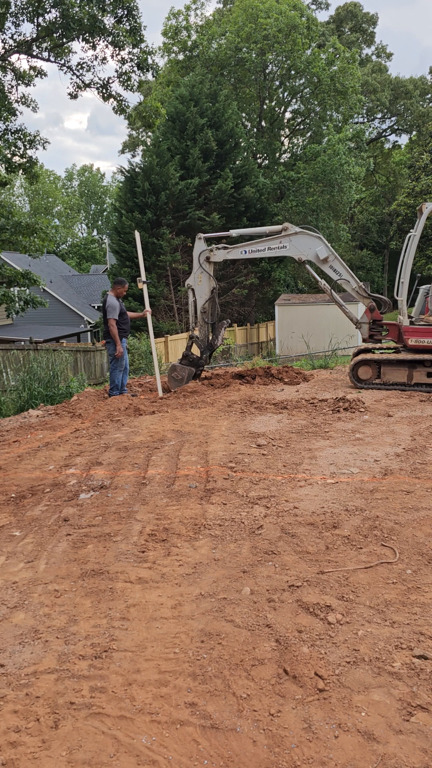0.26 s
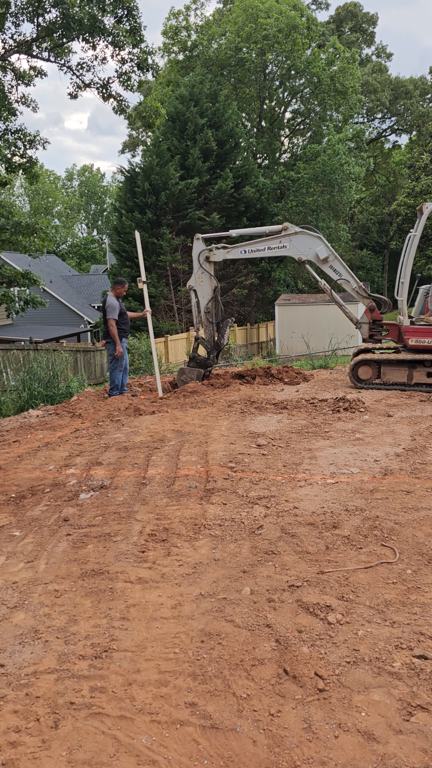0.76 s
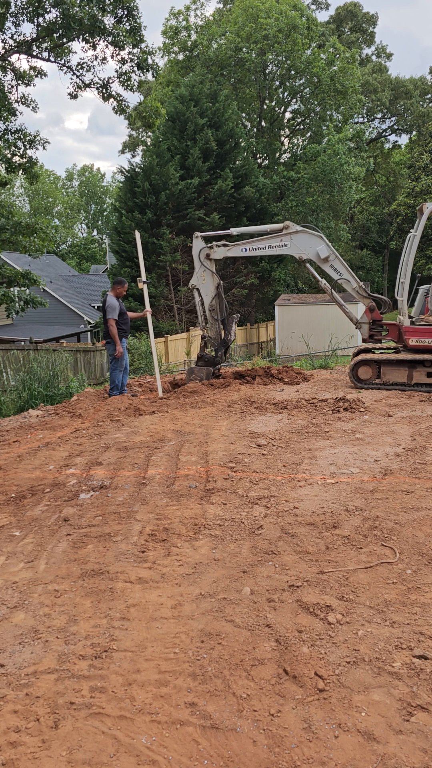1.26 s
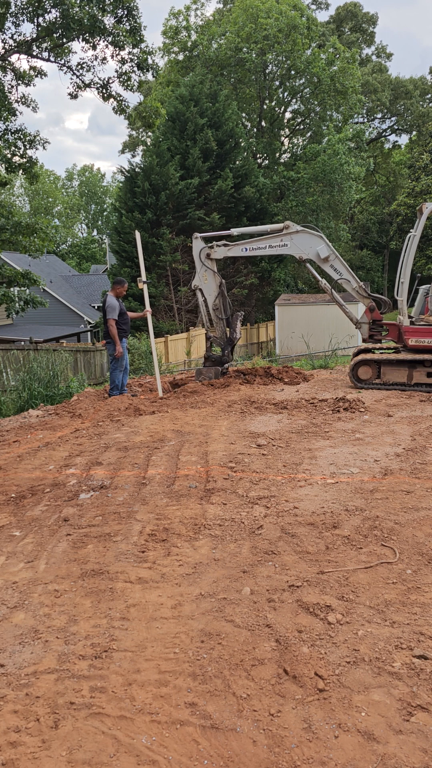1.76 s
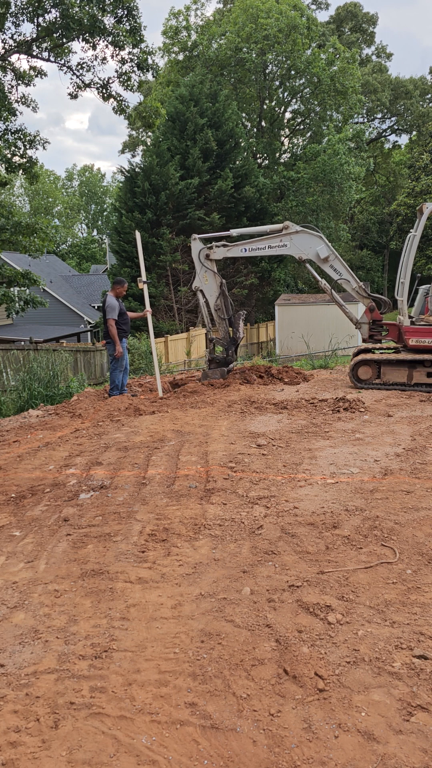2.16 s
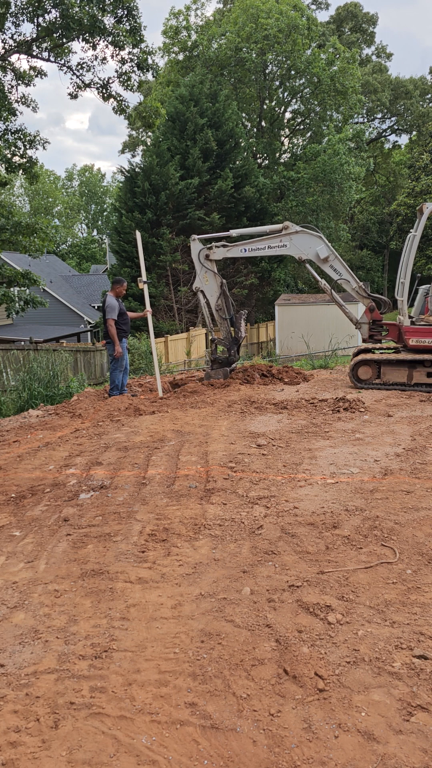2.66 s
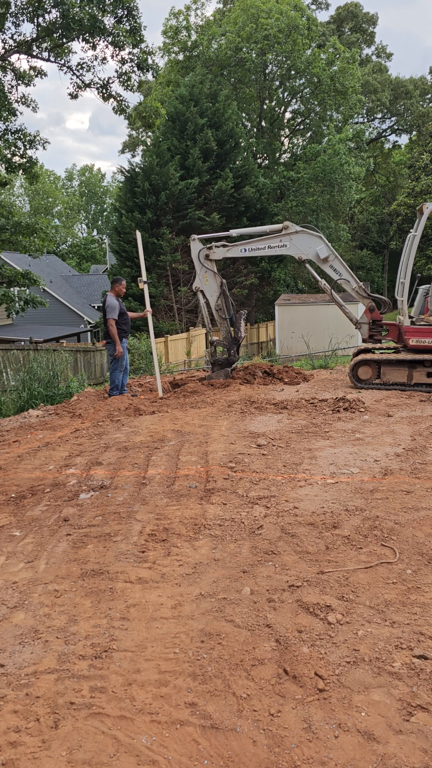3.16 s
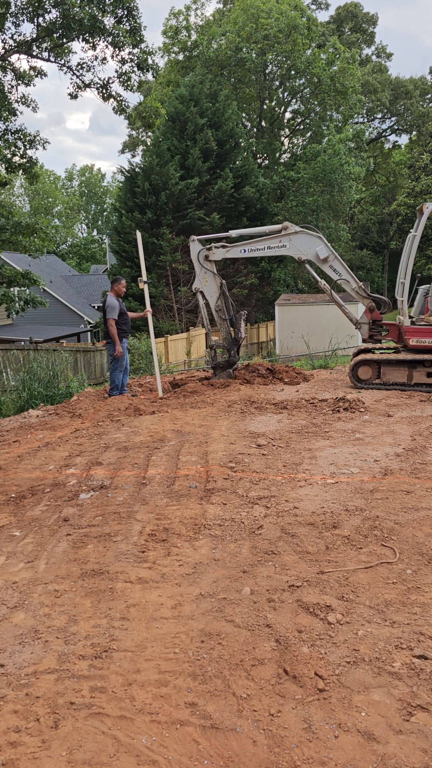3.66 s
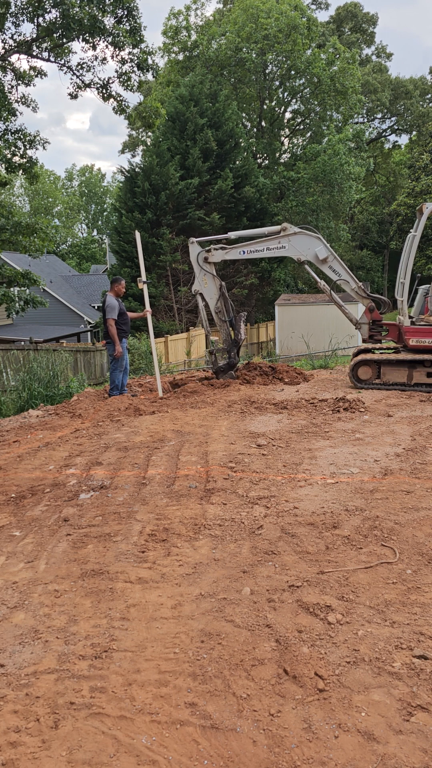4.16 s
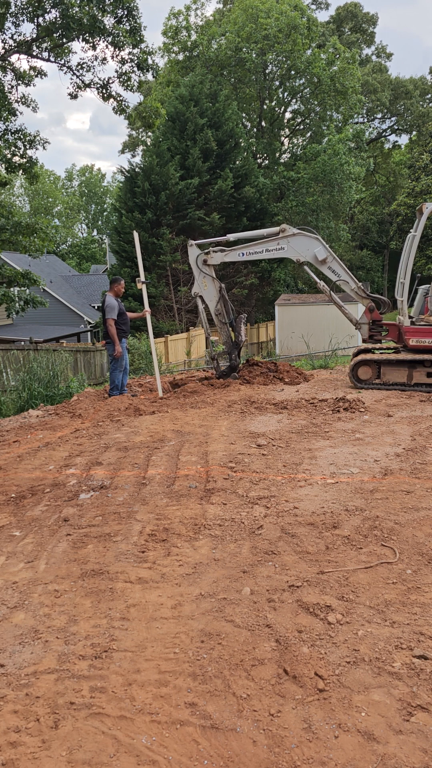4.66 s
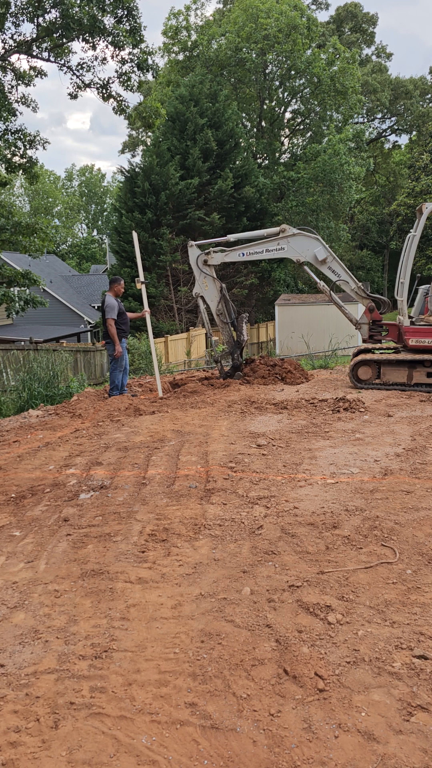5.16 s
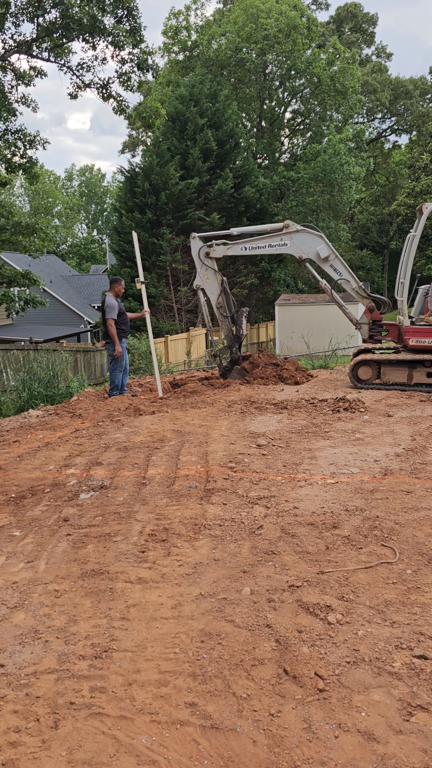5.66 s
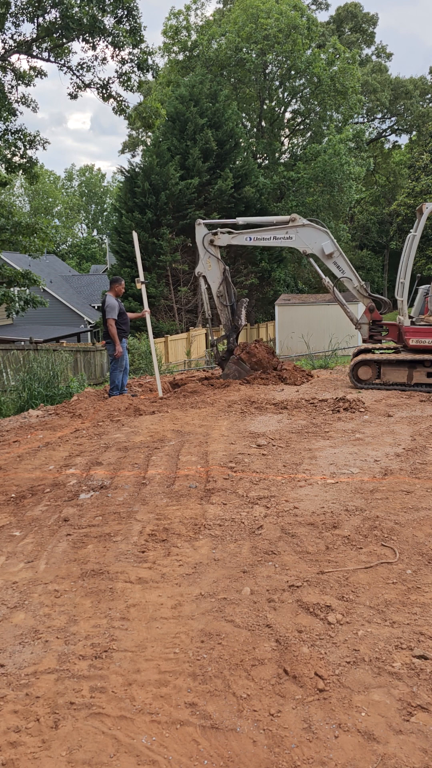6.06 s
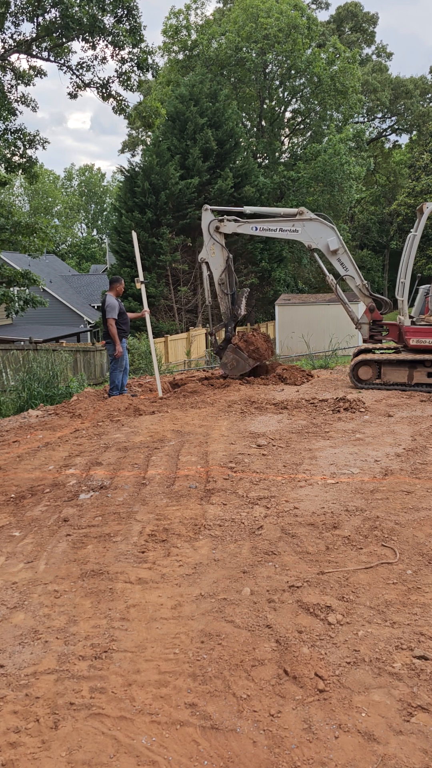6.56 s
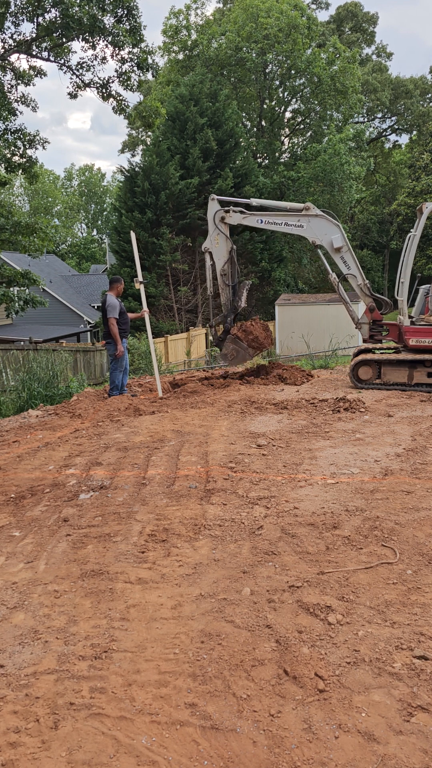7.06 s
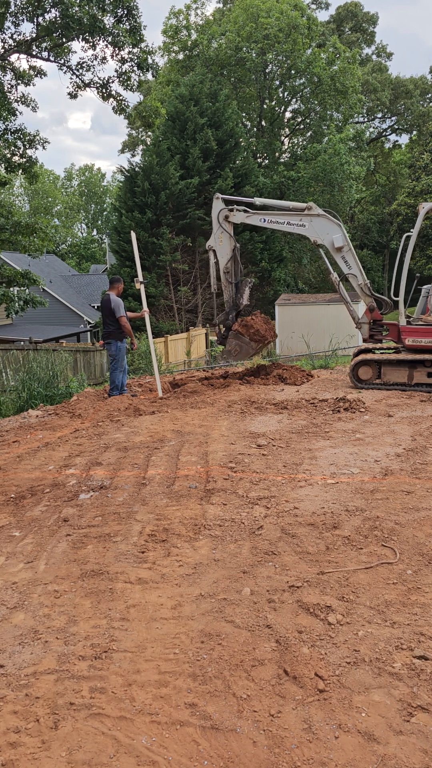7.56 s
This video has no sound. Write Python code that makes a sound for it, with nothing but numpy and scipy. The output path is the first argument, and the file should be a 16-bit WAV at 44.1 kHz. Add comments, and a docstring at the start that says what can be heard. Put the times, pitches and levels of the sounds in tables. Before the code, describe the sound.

Loud, hoarse single barks from a big dog near the stereo microphone come roughly every second, after one faint whine, with short reflections from fence and trees. Behind them, across an open building site, a small digger's diesel drones and clatters while its pump hums and oil hisses. The engine later runs lighter and a little faster, a valve gives a brief high whistle, and the arm lifts before the final bark.

```python
"""A building site on a stereo microphone: a mini excavator some way off, a big dog close by.
The bucket drags through clay; the three-cylinder diesel throbs and clatters, the pump hums, oil hisses
in the valves. The dog gives a faint whine, then barks eight times, about once a second; fence and trees
answer briefly. Near 5 s the bucket comes free, the engine picks up speed and the throb eases.
The boom valve opens with a thin whistle, and a short, light hoist follows before the last bark."""
import sys
import numpy as np
from scipy import signal
from scipy.fft import rfft, irfft, next_fast_len
from scipy.io import wavfile
from scipy.ndimage import uniform_filter1d, minimum_filter1d, map_coordinates

SR = 44100
rng = np.random.default_rng(int(sys.argv[2]) if len(sys.argv) > 2 else 0)


def store_wav(level_fs):
    """Save 16-bit WAV to argv[1]."""
    pcm = np.round(np.clip(np.atleast_2d(level_fs), -1, 1) * 32767)
    wavfile.write(sys.argv[1], SR, pcm.T.astype(np.int16))


N = 344862
T = np.arange(N) / SR


def amp(db):
    """Decibels to gain."""
    return 10 ** (np.asarray(db) / 20)


def unit(x):
    """x at rms 1."""
    return x / np.sqrt(np.mean(x ** 2) + 1e-20)


def along(points, hz):
    """Read (f/Hz, value) points on a log frequency axis."""
    f, v = np.transpose(points)
    return np.interp(np.log(hz + 1), np.log(f + 1), v)


def ramp(t, middle, ramp_s):
    """A straight rise from 0 to 1 that takes ramp_s."""
    return np.clip(.5 + (t - middle) / ramp_s, 0, 1)


def held(start, end, ramp_s):
    """1 between start and end, with sloping edges."""
    return ramp(T, start, ramp_s) - ramp(T, end, ramp_s)


def wobble(rate, size=N):
    """A smooth random curve, rate knots a second."""
    knots = rng.standard_normal(int(size * rate / SR) + 4)
    return map_coordinates(knots, [np.arange(size) * rate / SR], order=2)


def filtered(x, response):
    """x through a complex frequency response."""
    size = x.shape[-1]
    padded = next_fast_len(size + 8192)
    return irfft(rfft(x, padded) * response(np.fft.rfftfreq(padded, 1 / SR)), padded)[..., :size]


def coloured(x, spectrum):
    """x with a (f/Hz, level/dB) colour, at rms 1."""
    return unit(filtered(x, lambda hz: amp(along(spectrum, hz))))


def microphone(direct, scattered, alike, pan, lead_ms):
    """Two ports hear the direct sound slightly apart in time, the scattered sound with opposite signs."""
    turn = lambda hz: np.arccos(np.clip(along(alike, hz), -1, 1)) / 2
    mid = filtered(direct, lambda hz: np.cos(turn(hz)))
    side = filtered(scattered, lambda hz: np.sin(turn(hz)))
    ports = np.array([[.5], [-.5]])  # left, right
    bearing = lambda hz: amp(ports * along(pan, hz)) * np.exp(2j * np.pi * hz * lead_ms / 1000 * ports)
    return filtered(np.array([mid + side, mid - side]), bearing)


# exhaust and pump lines: multiple of the four-stroke cycle, relative level/dB loaded, and running free
ENGINE_LINES = [(3, -36.5, -39.5), (4, -61, -56), (5, -69, -61), (6, -18, -28.5), (7, -73, -59),
                (8, -56, -95), (9, -32.5, -32.5), (10, -41, -70), (11, -55.5, -49.5), (12, -29.5, -35.5),
                (13, -57.5, -46), (14, -81, -49.5), (15, -49, -56), (16, -59.5, -66), (17, -68, -53),
                (20, -46, -61), (21, -54, -83), (30, -70, -53.5), (40, -75, -61)]
def exhaust_and_pump(cycle, load, waver_db=.5, waver_rad=.12, dispersion=.081):
    """Tones locked to the engine's cycle; the firing multiples up to the fifteenth and the pump's lines hold
    steadiest, the rest waver more."""
    out = np.zeros(N)
    for k, loaded_db, free_db in ENGINE_LINES:
        unsteady = 1 if k in (3, 6, 9, 12, 15, 20, 40) else 3
        level = load * amp(loaded_db) + (1 - load) * amp(free_db)
        # under load the lines add up to sharp pulses; running free, their phases spread
        smear = dispersion * (1 - load) * (min(k, 15) - 6) ** 2
        phase = 2 * np.pi * k * cycle - smear + unsteady * waver_rad * wobble(6.7)
        out -= np.sqrt(2) * level * amp(unsteady * waver_db * wobble(14)) * np.cos(phase)
    return amp(-.14) * out


def knocks(cycle, depth_db):
    """A swell at each of the three firings in a cycle."""
    return unit(amp(depth_db * np.cos(2 * np.pi * 3 * cycle)))


# the diesel's low noise from across the site: f/Hz, level/dB
RUMBLE_COLOUR = [(15, -29), (40, -11), (70, -4.5), (130, -1), (190, 2), (250, -9), (340, -17.5), (500, -43)]
def rumble(load):
    """The engine's low roar, a little louder under load."""
    return amp(-36.5 + 2 * load) * coloured(rng.standard_normal(N), RUMBLE_COLOUR)


# engine rattle under load and running free: f/Hz, level/dB
LOADED_RATTLE = [(200, -36), (340, -11.5), (430, -3.5), (570, -3), (680, -7), (780, -5), (990, -14),
                 (1370, -6), (1580, -10), (2000, -7.5), (2400, -14.5), (2850, -12), (3500, -18.5),
                 (5000, -34)]
FREE_RATTLE = [(200, -34), (340, -8), (470, -0.5), (580, -11.5), (750, -4.5), (990, -15.5), (1300, -8),
               (1650, -9.5), (1950, -7.5), (2150, -5.5), (2350, -16), (2900, -12), (3600, -20), (5000, -36)]
def clatter(cycle, load, repeat_share=.8, uneven_db=1.0):
    """Valves and injectors rattle in a pattern that partly repeats every cycle."""
    def each_cycle(knots):
        return map_coordinates(rng.standard_normal(knots), [cycle % 1 * knots], order=3, mode="grid-wrap")

    pattern, accents = each_cycle(3072), each_cycle(24)
    rattle = np.sqrt(repeat_share) * pattern + np.sqrt(1 - repeat_share) * rng.standard_normal(N)
    rattle *= amp(uneven_db * accents) * knocks(cycle, depth_db=2.1)
    blend = load * coloured(rattle, LOADED_RATTLE) + (1 - load) * coloured(rattle, FREE_RATTLE)
    return amp(-43.5 + 1.36 * load) * blend


# the constant hiss of oil and the jet through each valve: f/Hz, level/dB
OIL_HISS = [(2500, -34), (3800, 2.5), (4600, 3.5), (5600, 1), (6700, 0), (7400, 2.5), (8200, -2), (9400, 2),
            (10300, -11), (11800, -12.5), (13000, -10), (15800, -14)]
CYLINDER_HISS = [(7800, -32), (8900, 0), (9700, -2), (10400, -16), (11300, -7), (12300, -5), (13000, -15),
                 (15000, -22)]
BOOM_HISS = [(8000, -35), (11500, -7), (13300, 0), (14500, 2), (15800, -3)]
# valve openings: opens t/s, closes t/s, jet level/dB on opening
CYLINDER_OPENINGS = [(-2, .45, -62), (3, 5.04, -58)]
BOOM_OPENINGS = [(5.35, 5.77, -57.5), (6.0, 7.14, -57.5)]
def oil(load, travel_s=.07, swell_db_per_s=1.4):
    """Pumped oil hisses harder under load; each valve adds a jet that grows while it stays open."""
    cylinder_open = sum(held(start, end, travel_s) for start, end, _ in CYLINDER_OPENINGS)
    hiss = amp(-52.5 + 4 * load + .3 * cylinder_open) * coloured(rng.standard_normal(N), OIL_HISS)
    for openings, jet in ((CYLINDER_OPENINGS, CYLINDER_HISS), (BOOM_OPENINGS, BOOM_HISS)):
        level = sum(amp(db + swell_db_per_s * (T - start)) * held(start, end, travel_s)
                    for start, end, db in openings)
        hiss += level * coloured(rng.standard_normal(N), jet)
    return hiss


# the arm drags through clay, then hoists: start t/s, end t/s, load 0-1
ARM_STROKES = [(-1, 4.83, 1), (6.5, 7, 0.25)]
# the machine at the microphone, a little to the left: f/Hz, left-right likeness
MACHINE_LIKENESS = [(130, 0.86), (300, 4), (640, 0.7), (1400, 1.8), (3100, 0.5), (7000, 0.27),
                    (15000, -0.5)]
# its balance: f/Hz, left minus right level/dB
MACHINE_BALANCE = [(100, 1.24), (700, 2.3), (2400, 1.9), (4400, 1.8), (8100, 4.6), (15000, 6.4)]
def excavator(free_hz=91.0, droop_hz=5.5):
    """The machine across the site: load on the arm slows the diesel and makes it louder."""
    load = np.clip(sum(share * held(start, end, ramp_s=.34) for start, end, share in ARM_STROKES), 0, 1)
    exhaust_hz = (free_hz - droop_hz * load ** 2) * (1 + .003 * wobble(2))  # the governor hunts a little
    cycle = np.cumsum(exhaust_hz) / SR / 6  # the main exhaust tone is twice the firing rate
    drift = amp(.26 * wobble(4.01))
    flow = amp(.27 * wobble(14)) * knocks(cycle, depth_db=1.5)

    def noises():
        return rumble(load) + drift * (flow * oil(load) + clatter(cycle, load))

    direct = exhaust_and_pump(cycle, load) + noises() + valve_whistle()
    scattered = noises()
    return microphone(direct, scattered, MACHINE_LIKENESS, MACHINE_BALANCE, lead_ms=.065)


def whine(start_s=.25, end_s=.363, start_hz=396, rise_hz_per_s=107):
    """A soft, nearly pure note from the dog swells and fades while its pitch creeps up."""
    pitch = (start_hz + rise_hz_per_s * (T - start_s)) * (1 + .011 * wobble(62))
    level = amp(-39) * held(start_s, end_s, ramp_s=.08)
    return level * np.sqrt(2) * np.sin(2 * np.pi * np.cumsum(pitch) / SR)


# the dog's throat with the jaw wide open, half shut and closing: f/Hz, level/dB
THROAT_OPEN = [(200, -17), (300, -21.5), (380, -6), (505, 1), (640, -3.5), (850, -8.5), (1150, -10),
               (1510, -4.5), (1690, -23), (2130, -24), (2340, -20), (2560, -38), (4000, -50)]
THROAT_HALF = [(200, -14), (300, -27), (380, -6.5), (510, 1.5), (640, -4), (800, -1), (1000, -14.5),
               (1300, -6.5), (1480, -17), (1690, -26), (2130, -21), (2300, -14.5), (2560, -34), (4000, -50)]
THROAT_CLOSING = [(200, -21), (300, -12), (385, -1.5), (480, -0.5), (640, -4.5), (780, -3.5), (1080, -6),
                  (1280, -17), (1560, -35), (2000, -36), (2250, -23), (2550, -41), (4000, -57)]
def throat(x, jaw, bright_db, sounding):
    """The upper resonance falls as the jaw shuts (1 to 0); a wider mouth lifts it by bright_db."""
    def shaped(spectrum):
        lift_db = lambda hz: bright_db * np.exp(-((hz - 1510) / 300) ** 2)
        return filtered(x, lambda hz: amp(along(spectrum, hz) + lift_db(hz)))

    wide, shut = np.maximum(2 * jaw - 1, 0), np.maximum(1 - 2 * jaw, 0)
    half = 1 - wide - shut
    voice = wide * shaped(THROAT_OPEN) + half * shaped(THROAT_HALF) + shut * shaped(THROAT_CLOSING)
    return voice / np.std(voice[sounding])


def effort(t, length, attack_s=.0077, release_s=.013, release_db_per_s=700):
    """The push behind a bark: a soft lead-in, a fast attack, a hold, a release."""
    lead_in = amp(-10) * ramp(t, middle=-.013, ramp_s=.011)
    attack = np.maximum(lead_in, ramp(t, attack_s / 2, attack_s))
    return attack * amp(-release_db_per_s * np.maximum(t - length + release_s, 0))


# the rasp of the dog's breath at close range: f/Hz, level/dB
BREATH_RASP = [(1500, -27), (2700, -2), (3600, 5.5), (4250, 9), (5200, 3), (6600, 2.5), (7750, 5),
               (8700, -17), (11600, -11), (13000, -29), (15800, -23)]
def bark(t, length, top_hz, closing_s, hoarse, bright_db, jitter=.0324, shimmer_db=3.0):
    """Ragged vocal pulses and air pass through the throat as the jaw closes; t counts from the onset."""
    size, sounding = len(t), (t > 0) & (t < length)
    jaw = 1 - ramp(t, closing_s, ramp_s=.088)
    # the voice is ragged at both ends and clears in the middle
    clear = np.exp(-((t / length - .58) / .24) ** 2)
    air_share = np.clip(hoarse * (.63 - .32 * clear), 0, 1)
    # the pitch climbs with the pressure, then breaks downwards
    scoop = .07023 * np.exp(-np.maximum(t, 0) / .0185)
    drop = .21 * (1 + np.tanh((t - closing_s) / .0091)) / 2
    pitch = top_hz * (1 - scoop - drop) * (1 + jitter * wobble(261.2, size))
    phase = 2 * np.pi * np.cumsum(pitch) / SR
    pulses = sum(np.cos(k * phase) / k ** 1.04 for k in range(1, 7))
    pulses *= amp(shimmer_db * wobble(147.9, size))
    air = rng.standard_normal(size) * (1 + .5 * np.cos(phase)) * amp(1.65 * wobble(192.3, size))
    voiced = throat(pulses, jaw, bright_db, sounding)
    breath = throat(air, jaw, bright_db, sounding)
    rasp = amp(-32.5 + 10 * jaw) * coloured(air, BREATH_RASP)
    return effort(t, length) * (np.sqrt(1 - air_share) * voiced + np.sqrt(air_share) * (breath + rasp))


# hard surfaces beside the dog: delay t/ms, level/dB
WALL_ECHOES = [(7.7, -17), (13.35, -8), (15.7, -24), (31.6, -15)]
def walls(x):
    """The sound and its first reflections."""
    echoes = lambda hz: sum(amp(db) * np.exp(-2j * np.pi * hz * ms / 1000) for ms, db in WALL_ECHOES)
    return filtered(x, lambda hz: 1 + echoes(hz))


# reverberation of the yard: f/Hz, t/s to fall by 60 dB
YARD_DECAY = [(300, 0.35), (800, 0.23), (1500, 0.15), (4000, 0.3), (12000, 0.24)]
def yard(x, build_up_s):
    """A brief, diffuse answer from ground, fence and trees; the bass lasts longest."""
    hz, t, noise = signal.stft(rng.standard_normal(SR // 2), SR, nperseg=256)
    envelope = amp(-60 * t / along(YARD_DECAY, hz)[:, None]) * (1 - np.exp(-t / build_up_s))
    _, tail = signal.istft(noise * envelope, SR, nperseg=256)
    return signal.fftconvolve(x, tail / np.linalg.norm(tail))[:len(x)]


# barks: onset t/s, length t/s, level/dB, top f/Hz, t/s from onset to half-shut jaw and pitch break,
# hoarseness factor, brightness/dB
BARK_ROW = [ (0.433, 0.12, -13, 508, .072, 1.55, 0.5), (1.517, 0.11, -14, 494.5, 0.083, 0.98, -1),
            (2.453, 0.12, -14, 515, 0.069, 1.34, 0), (3.468, 0.13, -14.5, 522, 0.073, 1.11, 0.5),
            (4.350, 0.075, -15.5, 462, 0.092, 0.9, -0.5), (5.488, 0.12, -12.5, 517, 0.076, 0.93, 1.5),
            (6.494, 0.12, -14, 525.2, .074, 1.44, 3.5), (7.568, 0.12, -13.5, 508, 0.076, 1.3, 1), ]
# the dog at the microphone: f/Hz, left-right likeness
DOG_LIKENESS = [(300, 1), (700, 0.94), (1400, 0.83), (3000, 0.72), (8000, 0.49), (15000, 0.31)]
# its balance: f/Hz, left minus right level/dB
DOG_BALANCE = [(200, 1), (380, 2.1), (700, 3.9), (1300, 4.1), (2400, 0.99), (8000, 0.69), (15000, 2)]
def dog():
    """Close to the microphone: a soft whine and a row of barks, each with its own echo."""
    direct, scattered = np.pad(whine(), (0, SR)), np.zeros(N + SR)
    t = np.arange(-SR // 20, SR // 2) / SR
    for onset, length, db, top_hz, closing_s, hoarse, bright_db in BARK_ROW:
        call = bark(t, length, top_hz, closing_s, hoarse, bright_db)
        heard = walls(call) + amp(-11) * yard(call, build_up_s=.02)
        gain = amp(db) / np.std(heard[(t > 0) & (t < length)])
        start = round((onset + t[0]) * SR)
        direct[start:start + len(t)] += gain * heard
        scattered[start:start + len(t)] += gain * amp(-1) * yard(call, build_up_s=.0012)
    return microphone(direct[:N], scattered[:N], DOG_LIKENESS, DOG_BALANCE, lead_ms=-.1)


def valve_whistle(start_hz=8900, sag_hz=1250, settle_s=.06, rise_s=.078, fade_db_per_s=50):
    """Over at the machine the boom valve first opens: a thin, fluttering tone falls and dies away."""
    age = np.maximum(T - BOOM_OPENINGS[0][0], 0)
    pitch = (start_hz - sag_hz * (1 - np.exp(-age / settle_s))) * (1 + .011 * wobble(700))
    level = np.minimum(age / rise_s, 1) * amp(-42 - fade_db_per_s * age)
    return level * np.sqrt(2) * np.sin(2 * np.pi * np.cumsum(pitch) / SR)


def scene():
    """The machine across the site and the dog nearby."""
    return excavator() + dog()


def record(dry):
    """The recorder's look-ahead limiter eases the peaks; nothing above its band limit is kept."""
    ceiling, window, top_hz = .96, 256, 15800
    needed = np.minimum(1, ceiling / (np.abs(dry).max(axis=0) + 1e-9))
    gain = uniform_filter1d(minimum_filter1d(needed, 2 * window), window)
    return filtered(dry * gain, lambda hz: hz < top_hz)


dry = scene()
out = record(dry)
store_wav(out)
```